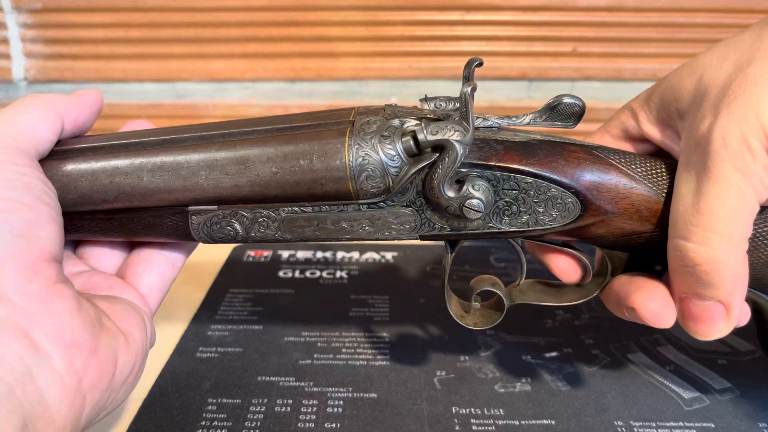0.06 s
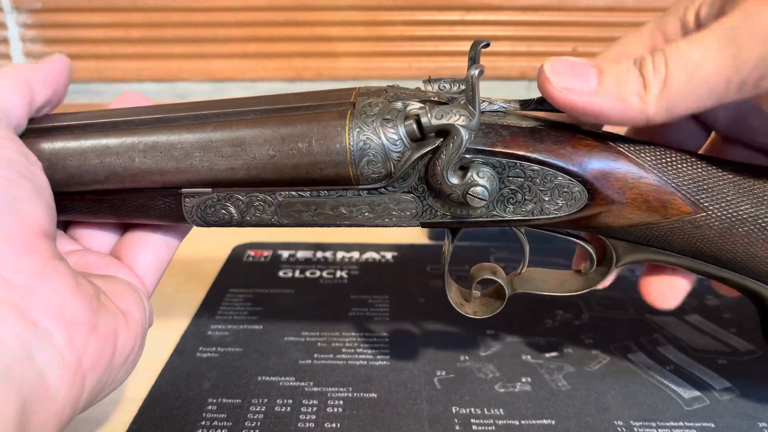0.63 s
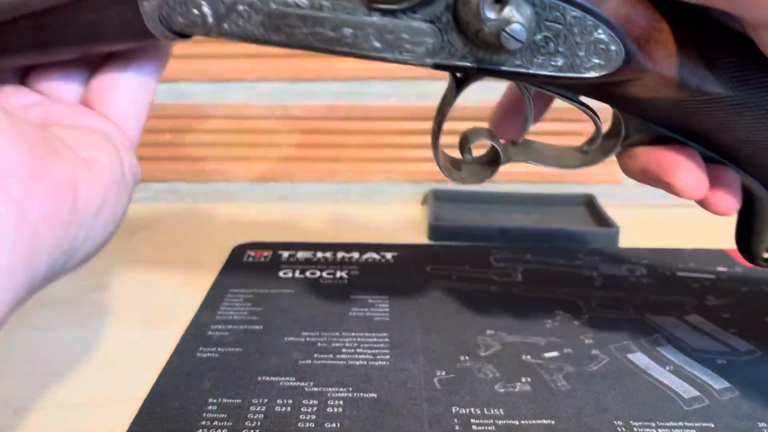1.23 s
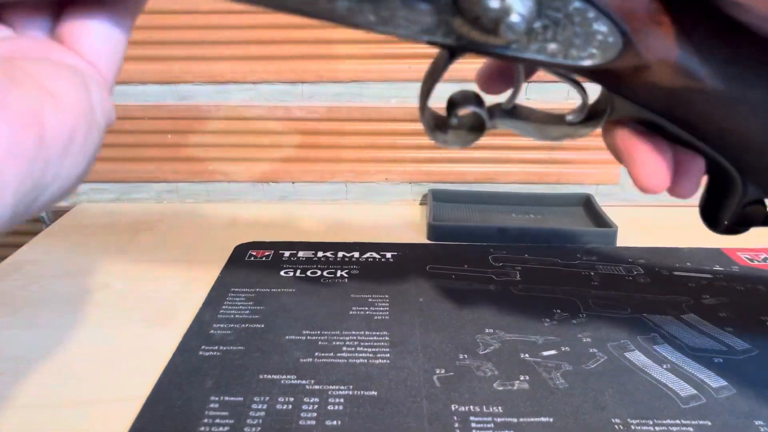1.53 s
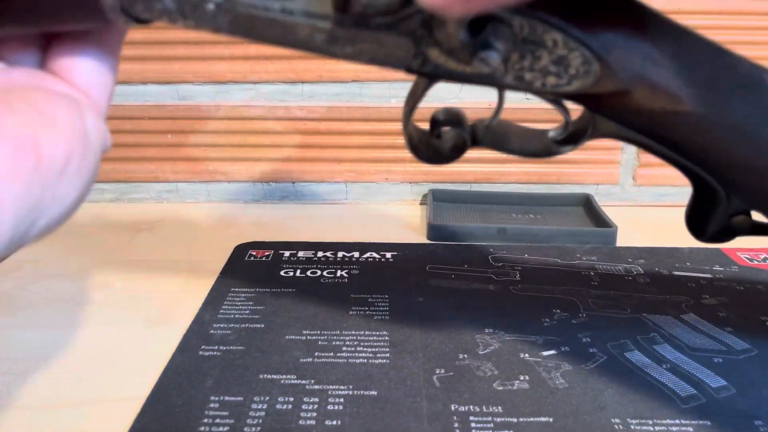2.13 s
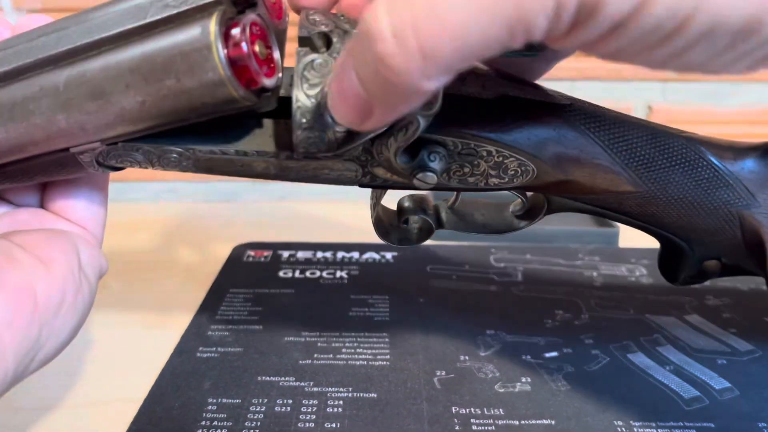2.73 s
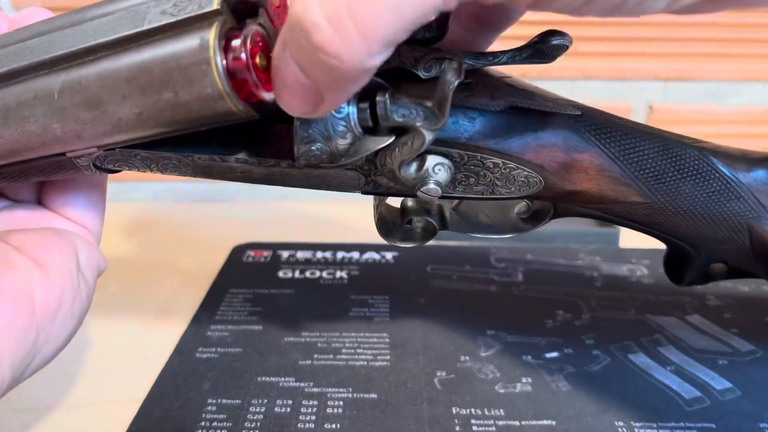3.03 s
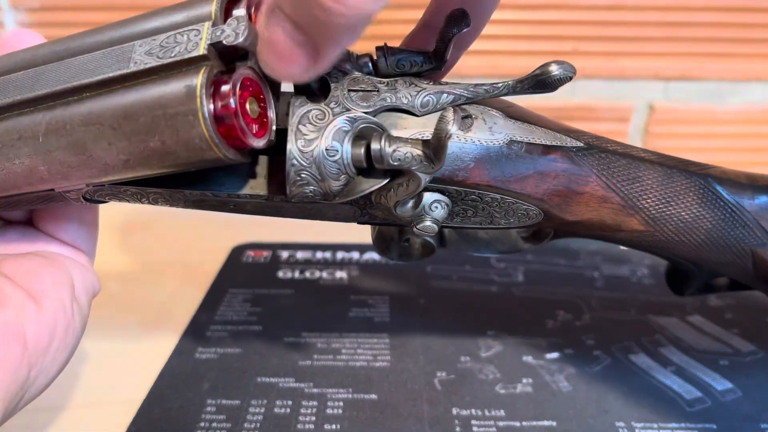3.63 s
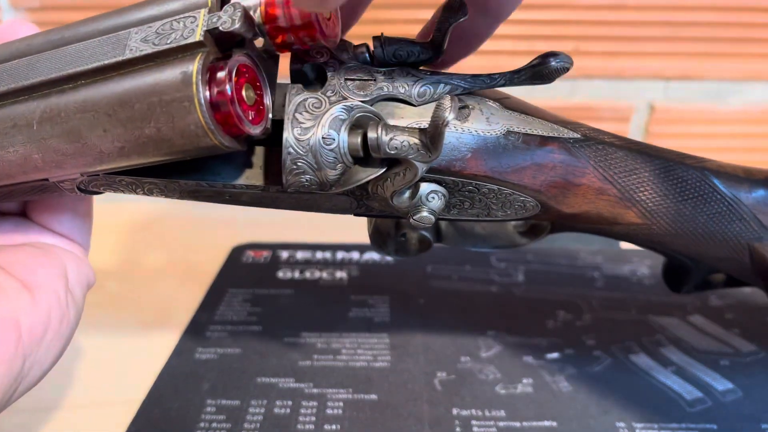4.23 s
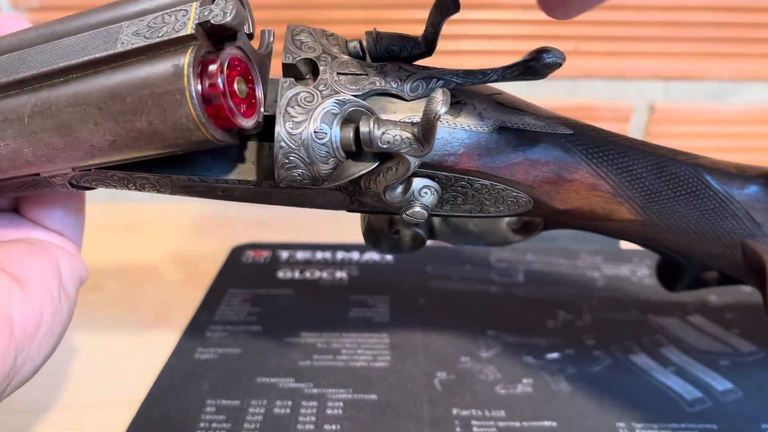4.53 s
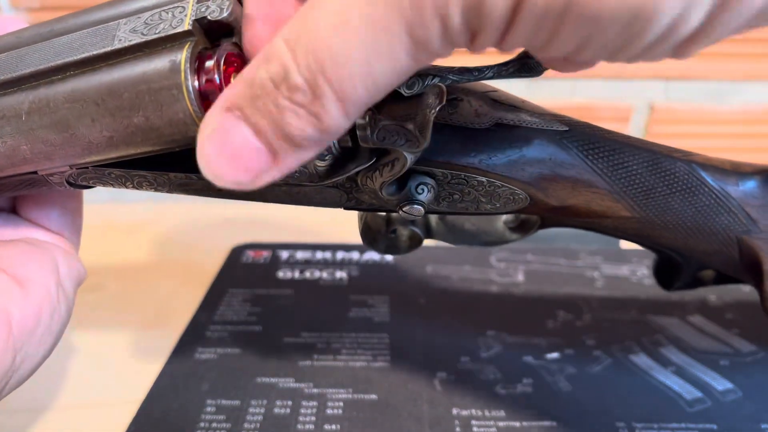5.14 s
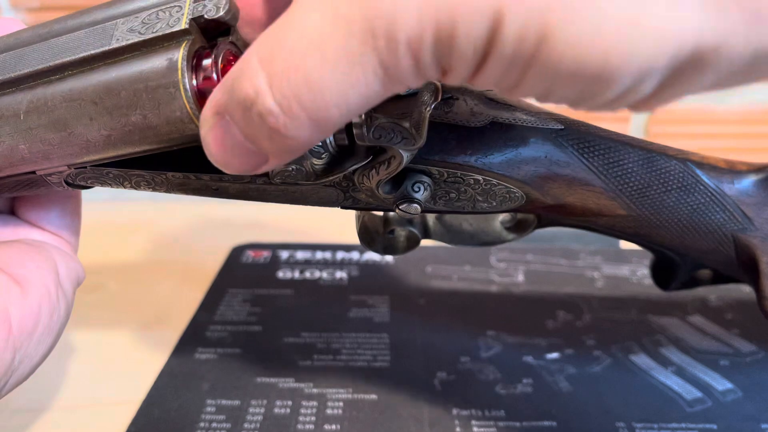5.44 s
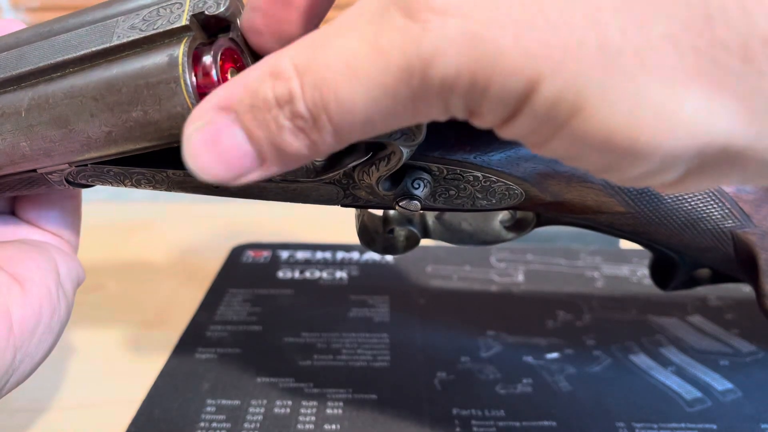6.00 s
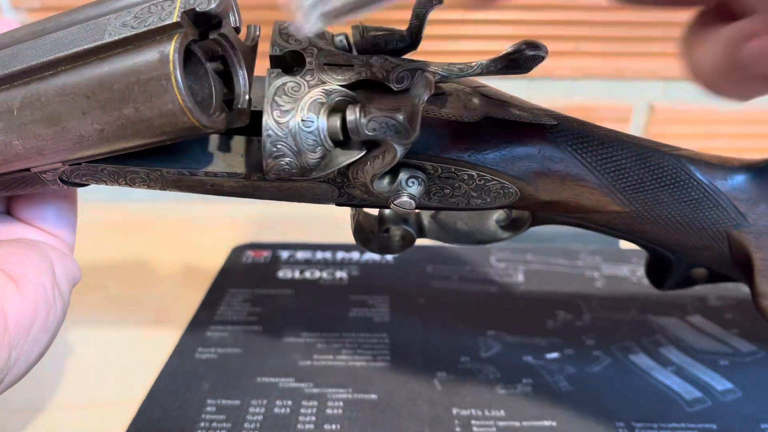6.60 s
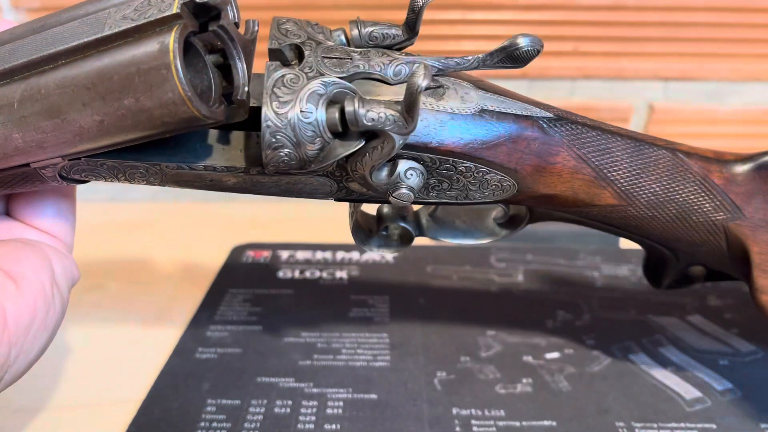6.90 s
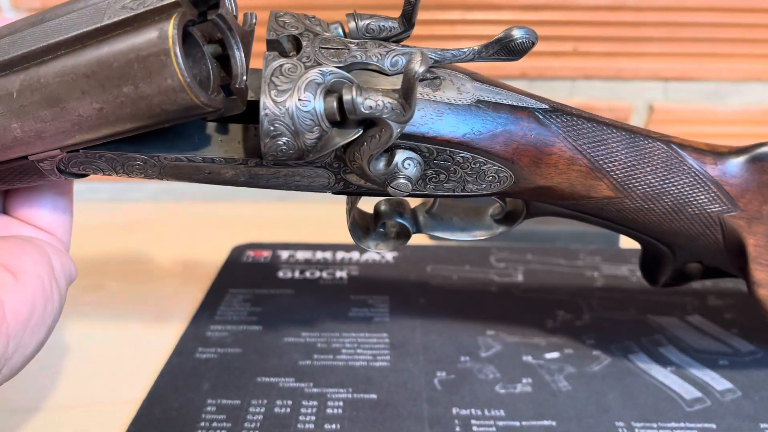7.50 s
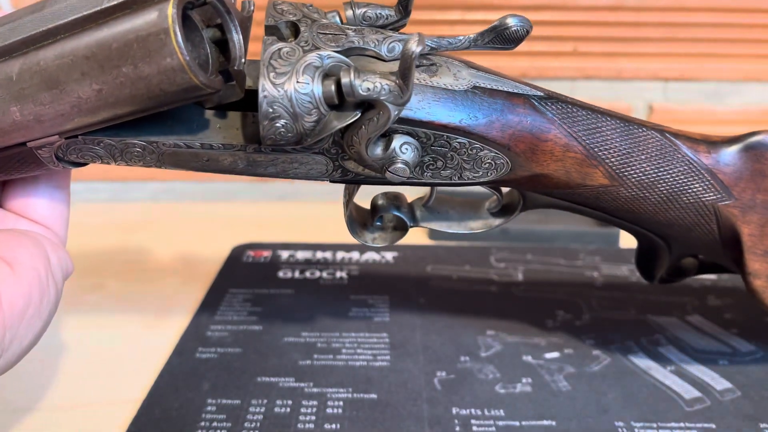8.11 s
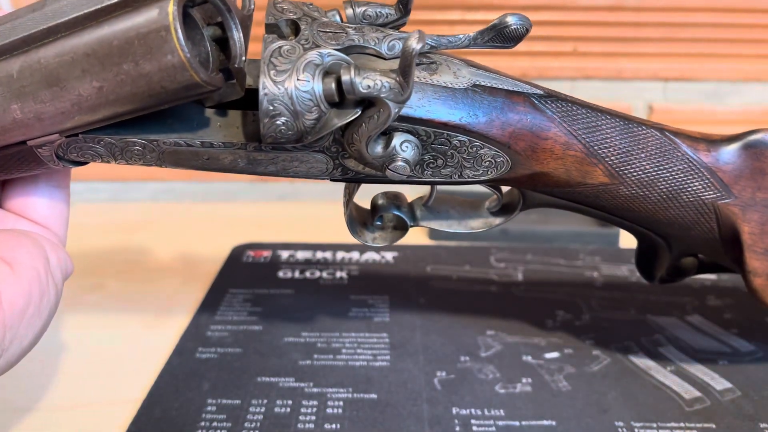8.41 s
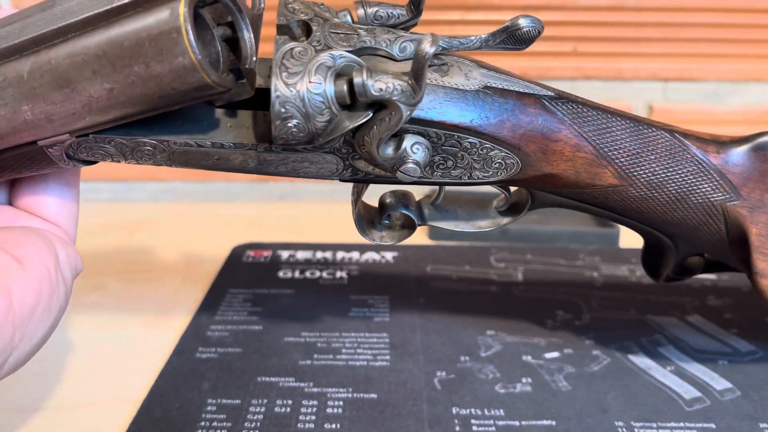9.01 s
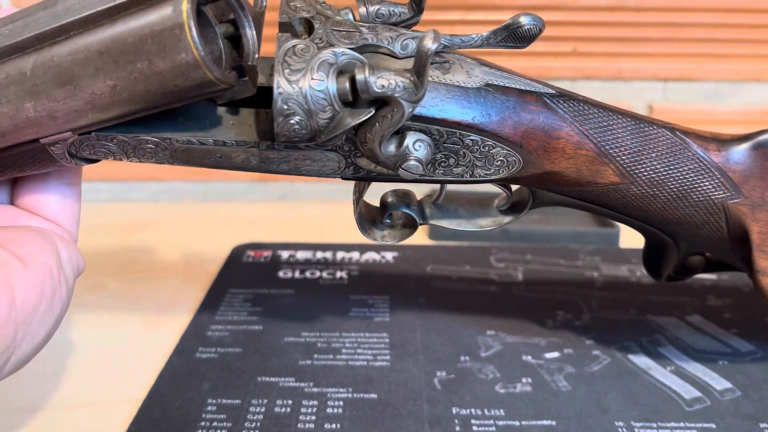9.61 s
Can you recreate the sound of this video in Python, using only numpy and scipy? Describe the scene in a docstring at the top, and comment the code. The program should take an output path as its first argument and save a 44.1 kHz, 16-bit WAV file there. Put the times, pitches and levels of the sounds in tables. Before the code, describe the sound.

Close clicks and a heavy clunk as a shotgun is opened and unloaded, followed by a drawer rolling and rattling with metal contents.

```python
"""Shotgun opened, drawer pulled

An old double-barrel shotgun is worked close by, over a bench in a small room. The top lever grinds
over, the barrels drop open with a thud, and two snap caps slide out, leaving the steel ringing.
Then a drawer is pulled: its contents clash, it rolls, rattles and bumps shut.
Blows are noise cracks plus damped modes; friction is random slips through resonances."""
import sys
import numpy as np
from scipy import signal
from scipy.fft import rfft, irfft, next_fast_len
from scipy.io import wavfile
from scipy.ndimage import map_coordinates

SR = 44100
rng = np.random.default_rng(int(sys.argv[2]) if len(sys.argv) > 2 else 0)


def digitize_waveform(pressure):
    """Quantize a signal to 16-bit integers and store it at the path in sys.argv[1].

    Rows of a 2-D input are taken as channels; values are limited to [-1, 1].
    """
    field = np.atleast_2d(pressure).T
    bounded = np.clip(field, -1, 1)
    quanta = np.round(bounded * 32767).astype(np.int16)
    wavfile.write(sys.argv[1], SR, quanta)


N = 429975

# contact spectrum of the gun: f/Hz, level/dB
GUN_SPECTRUM = [(30, -18), (70, -4.5), (155, 1), (215, -4), (265, 0), (400, -9), (600, -17.5), (760, -17.5),
                (1050, -22.5), (2100, -31.5), (3500, -45), (6500, -63), (9000, -60), (13000, -79.5)]


def amp(db):
    """Decibels to gain."""
    return 10 ** (np.asarray(db) / 20)


def unit(x):
    """x at rms 1."""
    return x / np.sqrt(np.mean(x ** 2) + 1e-30)


def along(points, hz):
    """(f/Hz, value) points interpolated on a log axis."""
    f, v = np.transpose(points)
    return np.interp(np.log(hz + 1), np.log(f + 1), v)


def wobble(rate_hz):
    """Smooth random curve, rate_hz knots a second."""
    knots = rng.standard_normal(int(N * rate_hz / SR) + 4)
    return map_coordinates(knots, [np.arange(N) * rate_hz / SR])


def swell(start_s, end_s, db, attack_s, release_s, growth_db_s=0):
    """Gain: db at start_s, sloping until end_s; the flanks outside take attack_s, release_s per 60 dB."""
    t = np.arange(N) / SR
    outside = np.maximum(start_s - t, 0) / attack_s + np.maximum(t - end_s, 0) / release_s
    held_s = np.clip(t, start_s, end_s) - start_s
    return amp(db + growth_db_s * held_s - 60 * np.minimum(outside, 4))


def filtered(x, response):
    """x times a complex frequency response."""
    n = x.shape[-1]
    m = next_fast_len(n + SR // 4)
    return irfft(rfft(x, m) * response(np.fft.rfftfreq(m, 1 / SR)), m)[..., :n]


def lowpass(x, corner_hz):
    """One-pole low-pass."""
    return filtered(x, lambda hz: 1 / (1 + 1j * hz / corner_hz))


def coloured(x, points, size=4096):
    """Minimum-phase filter through (f/Hz, level/dB) points."""
    cepstrum = irfft(np.log(amp(along(points, np.fft.rfftfreq(size, 1 / SR)))))
    cepstrum[1:size // 2] *= 2
    cepstrum[size // 2 + 1:] = 0
    impulse = irfft(np.exp(rfft(cepstrum)))
    return signal.fftconvolve(x, impulse[None], axes=1)[:, :x.shape[1]]


def resonate(x, modes):
    """Parallel resonances (f/Hz, width/Hz, level/dB) of alternating sign."""
    return filtered(x, lambda f: sum(
        (-1) ** k * amp(db) * 1j * f * width / (hz * hz - f * f + 1j * f * width)
        for k, (hz, width, db) in enumerate(modes)))


def stereo(pair):
    """Two unrelated signals as mid and side: left and right alike in the bass, unrelated above."""
    # side over mid: f/Hz, level/dB
    side_levels = [(60, -18.5), (125, -14), (260, -12.5), (500, -1.5), (1000, 0), (3000, -3), (8000, -2),
                   (12000, 0.5)]

    def mid_side(hz):
        ratio = amp(along(side_levels, hz))
        return np.array([np.ones_like(hz), ratio]) / np.hypot(1, ratio)

    mid, side = filtered(pair, mid_side)
    return np.array([mid + side, mid - side])


def room_tail(extra_build_s=0, dull_hz=6000):
    """Fresh diffuse tail of energy 1; the bass lasts longest."""
    # room decay: f/Hz, t60/s
    decay = [(80, 0.7), (300, 0.37), (1000, 0.45), (3000, 0.39), (7000, 0.32), (12000, 0.34)]
    build_s = 0.0026 + extra_build_s
    hz, t, noise = signal.stft(rng.standard_normal((2, SR)), SR, nperseg=256)
    fade = amp(-60 * t / along(decay, hz)[:, None]) * (1 - np.exp(-t / build_s))
    fade /= np.hypot(1, hz / dull_hz)[:, None]
    tail = signal.istft(noise * fade, SR, nperseg=256)[1][:, :SR]
    return tail / np.linalg.norm(tail[0])


def room(x, wet_db):
    """x plus reverberation."""
    return x + amp(wet_db) * signal.fftconvolve(x, room_tail(), axes=1)[:, :x.shape[1]]


def slips(rate_hz, spread_db):
    """Stick-slip: random pulses of uneven size, rms 1."""
    hit = rng.random(N) < rate_hz / SR
    strength = amp(spread_db * np.clip(rng.standard_normal(N), -2, 2))
    return unit(hit * strength * rng.standard_normal((2, N)))


def weighted(x, band_db, size=2646):
    """Tilt a blow's spectrum until its attack nears the given four band levels."""
    # edges of the thump, knock, clack and tick bands: f/Hz
    edges = [50, 250, 900, 4500, 12500]
    centres_hz = np.sqrt(np.multiply(edges[:-1], edges[1:]))
    fade = np.cos(np.linspace(0, np.pi / 2, size))
    for _ in range(2):
        power = 2 * np.mean(abs(rfft(x[:, :size] * fade, SR)) ** 2, axis=0) / SR / np.sum(fade ** 2)
        now_db = [10 * np.log10(power[lo:hi].sum() + 1e-30) for lo, hi in zip(edges, edges[1:])]
        x = coloured(x, np.column_stack([centres_hz, np.subtract(band_db, now_db)]))
    return x


def strikes(blows, modes, spectrum, ring_db, wet_db, detune, rise_share, size=28672):
    """Each contact: a brief crack, modes ringing at new strengths, a room tail."""
    out, t = np.zeros((2, N + size)), np.arange(size) / SR
    hz, mode_db, t60_s = np.transpose(modes)
    decays = amp(mode_db[:, None] - 60 * t / t60_s[:, None])
    for start_s, *band_db, contact_s in blows:
        # a longer contact starts more gently and fills the room more slowly
        rise = 1 - np.exp(-t / (rise_share * contact_s))
        crack = rng.standard_normal((2, size)) * amp(-60 * t / contact_s) * rise
        crack /= np.linalg.norm(crack[0])
        shifted_hz = hz * (1 + detune * rng.standard_normal(len(hz)))  # grip or cap depth varies
        turns = shifted_hz[:, None] * t + rng.random((len(hz), 1))
        phase = (2 * np.pi * turns).astype(np.float32)
        share = amp(rng.normal(0, 0.39, (2, len(hz)))) * rng.choice([-1, 1], (2, len(hz)))
        ring = np.array([share[0] @ (decays * np.sin(phase)), share[1] @ (decays * np.cos(phase))])
        tail = room_tail(extra_build_s=0.13 * contact_s)[:, :size]
        blow = stereo(crack + amp(wet_db) * tail + amp(ring_db) * ring)
        out[:, round(start_s * SR):][:, :size] += weighted(coloured(blow, spectrum), band_db)
    return out[:, :N]


def boom(hz=51.1):
    """A soft, low boom holds briefly at the start and fades."""
    tone = unit(np.sin(2 * np.pi * hz * np.arange(N) / SR))
    return swell(0, 0.15, db=-51, attack_s=0.01, release_s=0.65) * tone


def rumble():
    """Dull, heavy noise, rms 1."""
    # f/Hz, level/dB
    spectrum = [(20, -17), (59, 3), (175, -1.5), (385, -10.5), (588, -30), (740, -25), (852, -34),
                (1500, -37.5), (3000, -115)]
    return unit(coloured(stereo(rng.standard_normal((2, N))), spectrum))


def room_air():
    """Faint steady hiss and rumble of the room."""
    # hiss: f/Hz, level/dB
    spectrum = [(290, -33), (500, -4.5), (3860, -22.5), (8640, -18), (10200, -26.5), (11300, -18.5),
                (13000, -37)]
    hiss = unit(coloured(stereo(rng.standard_normal((2, N))), spectrum))
    return amp(-86) * hiss + amp(-72) * rumble()


def brushing():
    """Skin sliding over wood and steel, rms 1."""
    # f/Hz, level/dB
    spectrum = [(240, -31.5), (400, -4.5), (666, -5), (737, -2), (904, -13.5), (1130, -4), (1720, -18.5),
                (2360, -1.5), (2700, -15), (4620, -9.5), (5920, -15.5), (6650, -11.5), (10000, -13),
                (10900, -6), (13000, -37)]
    return unit(coloured(stereo(slips(rate_hz=7200, spread_db=1.0)), spectrum))


def hands():
    """Shifts of grip brush or rub; the rumble of jostling starts sooner and lasts longer."""
    # grip shifts: start/s, end/s, brush/dB, rumble/dB
    moves = [(0.0, 0.004, -54, -54), (0.47, 0.68, -76.5, -65.5), (1.777, 1.949, -100, -69.5),
             (2.238, 2.32, -90, -56.5), (2.699, 3.029, -102, -64.5), (3.69, 3.72, -92, -63),
             (4.224, 4.436, -87, -59.5), (5.2, 5.55, -94, -72), (5.618, 6.149, -100, -63.5),
             (6.416, 6.627, -84, -57), (6.82, 7.13, -82.5, -62), (8.4, 8.85, -90, -66),
             (9.116, 9.21, -61.5, -59.5), (9.25, 9.58, -71.5, -59.5), (9.492, 9.518, -54, -57)]
    # skin and steel rubbing on the action: start/s, end/s, level/dB, f/Hz
    rubs = [(2.24, 2.36, -81, 2010), (3.68, 3.72, -78, 1300)]
    brush = np.max([swell(start, end, db, attack_s=0.17, release_s=0.36)
                    for start, end, db, _ in moves], axis=0)
    jostle = np.max([swell(start, end, db, attack_s=0.29, release_s=0.4)
                     for start, end, _, db in moves], axis=0)
    return (rubbing(rubs)
            + brush * amp(1.0 + 1.2 * wobble(22)) * brushing()
            + jostle * amp(1.1 * wobble(9.5)) * rumble())


def bending(x, bass_lag_s=0.007, corner_hz=510):
    """Low bending waves cross the gun more slowly, so a blow sweeps down into its thud."""
    return filtered(x, lambda hz: np.exp(-2j * np.pi * hz * bass_lag_s / (1 + hz / corner_hz)))


def gun_blows():
    """Steel parts meet; the heavy barrels and wooden stock thud."""
    # on action and stock: t/s, thump/dB, knock/dB, clack/dB, tick/dB, contact t60/s
    blows = [(0.064, -56, -66, -51.5, -50.5, 0.015), (0.931, -63, -62, -68.5, -67, 0.026),
             (0.989, -31, -38, -52, -58.5, 0.029), (1.068, -37.5, -47.5, -54, -60, 0.021),
             (1.081, -44.5, -38, -45.5, -63, 0.04), (1.399, -19.5, -19.5, -32, -46.5, 0.036),
             (2.734, -47.5, -42.5, -52, -64, 0.15), (3.134, -31.5, -34, -43.5, -65.5, 0.14)]
    # whole gun: f/Hz, level/dB, t60/s
    modes = [(75, -5, 0.43), (159.15, 6, 0.42), (189, 2, 0.35), (266, -0.5, 0.3), (342, -4, 0.35),
             (379, 1.5, 0.35), (610, -1.5, 0.19), (750, 4.5, 0.27), (1095, 4.5, 0.27), (1210, 3, 0.26),
             (1703, 4, 0.24), (1885, 5, 0.23), (2200, 5, 0.18), (2620, 3, .18), (3050, 3.5, 0.14)]
    thuds = strikes(blows, modes, GUN_SPECTRUM,
                    ring_db=-49.5, wet_db=-7.0, detune=0.0027, rise_share=0.0079)
    return amp(-2.04) * bending(thuds)


def small_parts(contact_s=0.02):
    """Hammers, lever and extractor click in their play, with a short steel ring."""
    # t/s, clack/dB, tick/dB
    clicks = [(0.277, -73, -78), (0.343, -75, -79), (0.371, -63, -82), (1.011, -59, -66),
              (1.549, -61.5, -68.5), (1.623, -73, -79), (1.699, -79, -85), (1.849, -67.5, -82),
              (1.913, -71, -82), (2.533, -78, -97), (2.917, -79.5, -95), (2.988, -82.5, -84),
              (6.178, -74, -86.5)]
    # small steel parts: f/Hz, level/dB, t60/s
    modes = [(791, 1, .12), (1114, -1.5, .11), (1750, -2, .09), (2293, 1, .05), (3050, -2.5, 0.059)]
    blows = [(start_s, clack, clack, clack, tick, contact_s) for start_s, clack, tick in clicks]
    return strikes(blows, modes, GUN_SPECTRUM, ring_db=-35, wet_db=-10, detune=0.07, rise_share=0.04)


def lever():
    """Slips of lever and hinge keep a low mode of the gun groaning, louder with more force."""
    # force builds until the bolts clear, then the hinge swings lightly: t/s, level/dB
    force = [(0.985, -52), (0.997, -36), (1.05, -37), (1.11, -31), (1.18, -32.5), (1.235, -33.5),
             (1.305, -32.5), (1.336, -44.5), (1.39, -44.5), (1.43, -71)]
    # grinding resonances: f/Hz, width/Hz, level/dB
    modes = [(155.6, 17, 7.5), (289.9, 174, -7.5), (444, 130, -5), (795, 38, -12.5), (1090, 54, -31),
             (1690, 780, -39.5), (4000, 4000, -51.5)]
    drive = room(slips(rate_hz=680, spread_db=1.6) * amp(2.0 * wobble(30)), wet_db=-4.5)
    groan = unit(stereo(lowpass(resonate(drive, modes), 3000)))
    push = amp(np.interp(np.arange(N) / SR, *np.transpose(force), left=-np.inf, right=-np.inf))
    return push * (groan + amp(-16) * rumble() + amp(-36) * brushing())


def ringing(modes, start_s, attack_s=0.00063):
    """Modes set off together; the high ones reach left and right up to a quarter turn apart."""
    t = np.arange(2 * SR) / SR
    skew_rad = np.array([[0], [np.pi / 2]])
    ring = sum(amp(db - 60 * t / t60_s) * np.sin(2 * np.pi * hz * t + skew_rad * min(1, hz / 2000))
               for hz, db, t60_s in modes)
    ring *= 1 - np.exp(-t / attack_s)
    return np.pad(ring, ((0, 0), (round(start_s * SR), N)))[:, :N]


def barrels():
    """The barrels fall against their stop; later the first cap's rim flicks them as it comes free."""
    # shudder of the whole gun: f/Hz, level/dB, t60/s
    drop_modes = [(74.6, -1, 0.33), (103, -2, .25), (263.3, -2, 0.33), (488, -1.5, .16), (513, -4.5, .16)]
    # barrel tubes: f/Hz, level/dB, t60/s
    tube_modes = [(626, 12, .36), (1130, 4, .22), (1443, 6, .3), (1798, 12, .2), (2799, -8, .68),
                  (3175, -12, 1.0), (3426, -4, 1.05), (3572, -12.5, 1), (3790, -8.5, 1.6),
                  (4045, -11.5, .9), (4500, -11, .75), (4595, -14, .8), (5324, -13, .7), (5766, -10, .72),
                  (6005, -6, .58)]
    shudder = bending(ringing(drop_modes, start_s=1.4))
    return amp(-23.5) * shudder + amp(-59.0) * ringing(tube_modes, start_s=4.46)


def rubbing(strokes):
    """Each stroke: tiny slips through a narrow resonance, with a wide fuzz around it."""
    out = np.zeros((2, N + SR))
    grit = np.pad(stereo(slips(rate_hz=1700, spread_db=2.5)), ((0, 0), (0, SR)))
    for start_s, end_s, db, hz in strokes:
        onset = round(start_s * SR)
        span = slice(onset - SR // 2, onset + SR // 2)
        note = unit(resonate(grit[:, span], [(hz, 0.092 * hz, 0)]))
        fuzz = unit(resonate(grit[:, span], [(hz, 0.8 * hz, 0)]))
        gain = np.pad(swell(start_s, end_s, db, attack_s=0.088, release_s=0.06), (0, SR))[span]
        out[:, span] += gain * filtered(note + amp(-4.5) * fuzz, lambda f: 1 / (1 + 0.5j * f / hz) ** 2)
    return out[:, :N]


def cap_clicks():
    """The light caps click against the chambers, each time from a different depth."""
    # t/s, thump/dB, knock/dB, clack/dB, tick/dB, contact t60/s
    blows = [(3.908, -75, -55.5, -52, -67, 0.031), (3.929, -53, -72, -84, -68, 0.027),
             (4.326, -58, -63.5, -63, -72, 0.046), (4.428, -63, -72, -49, -59, 0.1),
             (4.4505, -64.5, -47.5, -40, -36, 0.029), (4.827, -83, -87, -83.5, -71.5, 0.1),
             (5.604, -59.5, -67, -55.5, -69, 0.022), (5.639, -60.5, -71.5, -79, -70, 0.034),
             (5.801, -53, -52.5, -46, -54.5, 0.025), (6.044, -62, -64, -62, -94, 0.038),
             (6.478, -56.5, -67.5, -67, -70, 0.14), (6.558, -66, -60, -52, -58, 0.012)]
    # cap in its chamber: f/Hz, level/dB, t60/s
    modes = [(626, -5, .16), (775, -3, .12), (1110, -3, .12), (1443, -6, .14), (1798, 0, .13),
             (2595, 1, .07), (3020, 3, .05), (7700, -2, .1), (8300, 2, .04), (11000, -9, .14)]
    # contact: f/Hz, level/dB
    spectrum = [(35, -39), (60, -8.5), (151, 14.5), (557, -7), (763, -3), (1790, -13), (2100, -21),
                (2570, -6.5), (3770, -9), (7580, -3.5), (11400, -4.5), (13000, -38)]
    return amp(0.4) * strikes(blows, modes, spectrum,
                              ring_db=-39.0, wet_db=-12.5, detune=0.01, rise_share=0.049)


def singing(hz, width_hz):
    """Stereo noise band around a moving centre, rms 1."""
    phase = 2 * np.pi * np.cumsum(hz) / SR
    pair = [wobble(width_hz) * np.sin(phase) + wobble(width_hz) * np.cos(phase) for _ in range(2)]
    return unit(stereo(np.array(pair)))


def cap_slides():
    """A cap's rim scrapes the chamber wall; the chamber's hollow note and overtone glide."""
    # a nudged cap slows and fades, a drawn one speeds up and swells:
    # start/s, end/s, start level/dB, growth/(dB/s), start f/Hz, end f/Hz
    strokes = [(3.91, 3.96, -63.5, -89, 3070, 2850), (4.108, 4.262, -70, -54.5, 2850, 3100),
               (4.318, 4.44, -69.5, 93.5, 2780, 3500), (5.595, 5.719, -72, -40.5, 3076, 3100),
               (5.762, 5.79, -71, 42, 3000, 3000), (6.142, 6.24, -84, -39, 2914, 2900),
               (6.299, 6.461, -80.5, 98.5, 2477, 3450), (6.462, 6.535, -57, -50.5, 3184, 2500)]
    # scrape resonances: f/Hz, width/Hz, level/dB
    modes = [(340, 200, 2), (836, 250, -0.5), (1600, 240, -4.5), (2716, 900, -8.5), (4695, 990, -10),
             (8300, 500, 0), (11500, 280, 4.5)]
    scrape = unit(stereo(resonate(slips(rate_hz=1200, spread_db=4.0), modes)))
    gains = np.array([swell(start, end, db, attack_s=0.035, release_s=0.13, growth_db_s=growth)
                      for start, end, db, growth, _, _ in strokes])
    # the loudest stroke sets the pitch
    start_s, end_s, _, _, from_hz, to_hz = np.transpose(strokes)[:, gains.argmax(axis=0)]
    progress = np.clip((np.arange(N) / SR - start_s) / (end_s - start_s), 0, 1)
    hz = from_hz + (to_hz - from_hz) * progress
    hollow = amp(-8) * singing(hz, width_hz=830) + amp(-5.5) * singing(2.8 * hz, width_hz=1100)
    uneven = amp(0.5 + 2.2 * wobble(40))
    return room((scrape + hollow) * gains.max(axis=0) * uneven, wet_db=-8.5)


def cabinet_knocks():
    """Farther off, the drawer knocks in its wooden cabinet."""
    # t/s, thump/dB, knock/dB, clack/dB, tick/dB, contact t60/s
    blows = [(7.2395, -51, -39.5, -36.5, -60, 0.15), (7.611, -54, -34, -39, -55, 0.031),
             (7.618, -46.5, -39.5, -42, -53, 0.023), (8.704, -50, -62.5, -70, -74.5, 0.031),
             (8.854, -45, -48.5, -44, -67, 0.1), (9.472, -33.5, -37.5, -51.5, -55, 0.052)]
    # cabinet: f/Hz, level/dB, t60/s
    modes = [(615, -10, 0.2), (782, 0.5, .16), (1027, -3.5, .14), (1210, -7, 0.22), (1663, -3.5, 0.28),
             (1984, 2, .19), (3250, -4, .1)]
    # contact: f/Hz, level/dB
    spectrum = [(30, -14), (120, 3), (520, -5), (800, -2), (2000, -3.5), (3000, -9.5), (3900, -20),
                (6300, -26.5), (8700, -23), (13000, -40)]
    return amp(-0.6) * strikes(blows, modes, spectrum,
                               ring_db=-39.5, wet_db=-5.0, detune=0.004, rise_share=0.012)


def drawer():
    """The runners scrape and sing, jolted contents chatter, the cabinet booms."""
    # creep, run out, run back: start/s, end/s, start level/dB, growth/(dB/s)
    runs = [(7.276, 7.698, -71.5, 4), (7.952, 8.403, -53.5, -11), (8.503, 9.06, -56.5, 9.5)]
    # runners: f/Hz, width/Hz, level/dB
    runner_modes = [(474, 18, 6), (754, 15, -3.5), (1065, 110, -15), (1740, 990, -36)]
    # scrapes before the clash: start/s, end/s, level/dB, f/Hz
    scrapes = [(7.494, 7.55, -61, 967), (7.48, 7.55, -67, 2000), (7.565, 7.594, -62, 5724)]
    # jolts of the contents: start/s, end/s, level/dB
    jolts = [(8.866, 8.946, -34.5), (8.99, 9.01, -42), (9.102, 9.117, -60)]
    # chatter: f/Hz, level/dB
    chatter_spectrum = [(30, -20), (202, 1.5), (520, -17), (730, -8), (886, -16), (2120, -12),
                        (4070, -36.5), (7450, -34), (9490, -42), (10200, -65), (11500, -33), (13000, -102)]
    # cabinet booms after clash and catch: t/s, level/dB
    booms = [(7.77, -43.5), (9.04, -43)]
    roll_flanks = dict(attack_s=0.45, release_s=0.37)

    runners = lowpass(resonate(slips(rate_hz=2400, spread_db=1.0), runner_modes), 2500)
    roll_gain = np.max([swell(start, end, db, growth_db_s=growth, **roll_flanks)
                        for start, end, db, growth in runs], axis=0)
    rolling = roll_gain * amp(2.7 * wobble(14)) * unit(stereo(runners))
    jolt_gain = sum(swell(*jolt, attack_s=0.061, release_s=0.048) for jolt in jolts)
    chatter = jolt_gain * unit(coloured(stereo(slips(rate_hz=600, spread_db=2.5)), chatter_spectrum))
    clatter = room(rubbing(scrapes) + amp(-4.5) * chatter, wet_db=-2.5)
    travel_gain = swell(runs[0][0], runs[-1][1], db=-61.5, **roll_flanks)
    boom_gain = sum(swell(at_s, at_s, db, attack_s=0.09, release_s=0.82) for at_s, db in booms)
    return rolling + clatter + np.hypot(travel_gain, boom_gain) * rumble()


def contents_clash():
    """Steel things collide and ring in the drawer."""
    # t/s, thump/dB, knock/dB, clack/dB, tick/dB, contact t60/s
    blows = [(7.563, -70, -68, -63, -64, 0.02), (7.7085, -40, -30, -21.5, -30, 0.022),
             (7.7243, -36, -27, -19, -21, 0.02), (7.738, -42, -37, -29, -38, 0.02),
             (7.777, -49, -34, -29.5, -41, 0.03)]
    # steel contents: f/Hz, level/dB, t60/s
    modes = [(258, -1, .36), (474, 1, .4), (1120, -1, .36), (1454, 4, .44), (1656, 4, .36),
             (1738, 2.5, .38), (1794, -3, .33), (1976, -2, .33), (2257, 0, .32), (2498, -3.5, .45),
             (2576, 2, .3), (2685, 2, .33), (2790, 0, .38), (3386, -3, .46), (3914, -4, .44),
             (4540, -11, .6), (5771, -9, .62), (7185, 4, .28), (7397, 2, .28), (11200, -1, .2)]
    # contact: f/Hz, level/dB
    spectrum = [(30, -17.5), (70, 0.5), (250, 3), (560, -5), (1800, 0.5), (2700, -1), (4000, -6.5),
                (5500, -20), (7300, -9.5), (9300, -12), (10300, -24), (11200, -1), (12600, -41)]
    return amp(-1.26) * strikes(blows, modes, spectrum,
                                ring_db=-48.0, wet_db=-3.5, detune=0.0013, rise_share=0.012)


def catch_snaps():
    """A catch snaps and bounces as the drawer closes."""
    # t/s, thump/dB, knock/dB, clack/dB, tick/dB, contact t60/s
    blows = [(8.9877, -43.5, -41.5, -32.5, -42.5, 0.017), (9.0, -50, -46, -35.5, -51, 0.013),
             (9.018, -43, -49.5, -37.5, -61, 0.015), (9.496, -59, -58.5, -51, -57, 0.05)]
    # catch: f/Hz, level/dB, t60/s
    modes = [(750, -1.5, 0.16), (1043, -5, 0.12), (1222, -4.5, 0.35), (1364, -13, 0.17), (1740, 4.5, 0.11),
             (2280, 6, 0.053), (3590, 8.5, 0.026), (6830, -2, 0.13), (7440, -1, 0.092)]
    # contact: f/Hz, level/dB
    spectrum = [(40, -12), (150, 2), (400, -10), (1100, -5), (2100, -1), (3700, -9), (5400, -26.5),
                (7300, -15), (9200, -20), (13000, -37)]
    return amp(-1.1) * strikes(blows, modes, spectrum,
                               ring_db=-35.0, wet_db=-4.5, detune=0.002, rise_share=0.0093)


def scene():
    """Breech a little to the left, the rest near the centre."""
    breech = cap_clicks() + cap_slides() + barrels()
    action = gun_blows() + small_parts() + lever()
    furniture = cabinet_knocks() + contents_clash() + catch_snaps() + drawer()
    near_centre = action + furniture + hands()
    return breech * amp([[1.3], [-1.3]]) + near_centre * amp([[0.4], [-0.4]]) + boom() + room_air()


def record(dry, top_hz=13200):
    """The microphone rolls off deep bass and top, and passes nothing above top_hz."""
    # f/Hz, level/dB
    response = [(18, -15.5), (42, 1), (11500, 0), (12100, -7.5), (12700, -21), (13300, -30)]
    return filtered(dry, lambda hz: amp(along(response, hz)) * (hz < top_hz))


dry = scene()
out = record(dry)
digitize_waveform(out)
```